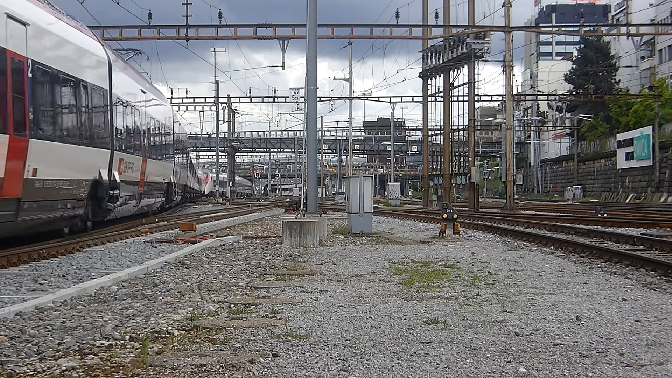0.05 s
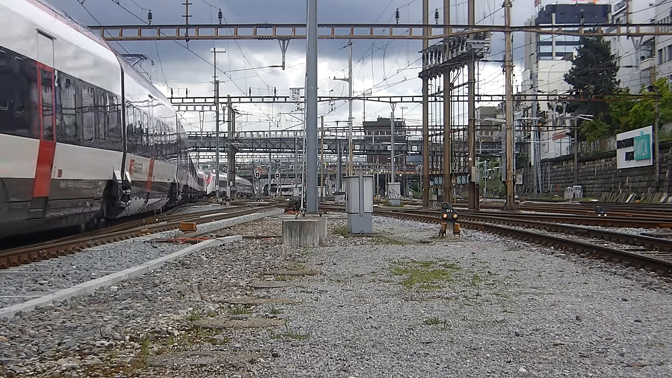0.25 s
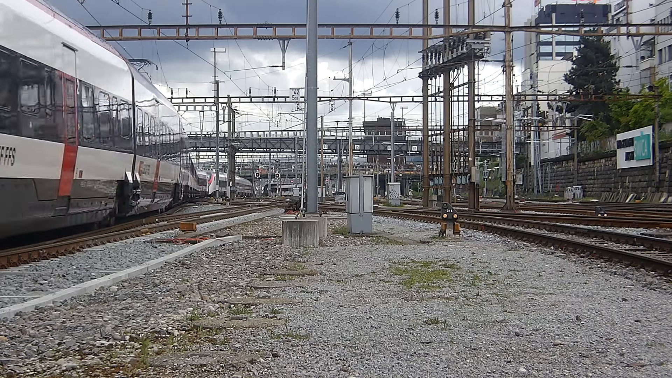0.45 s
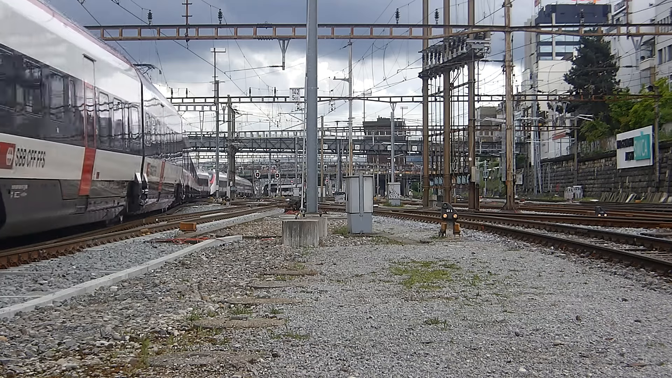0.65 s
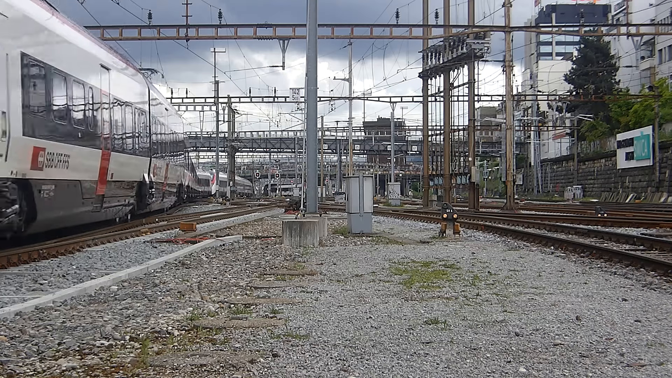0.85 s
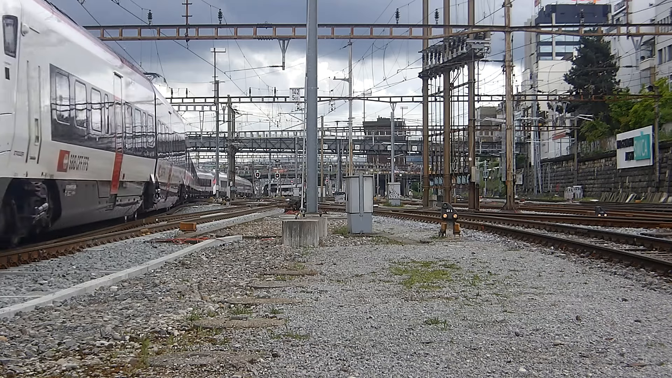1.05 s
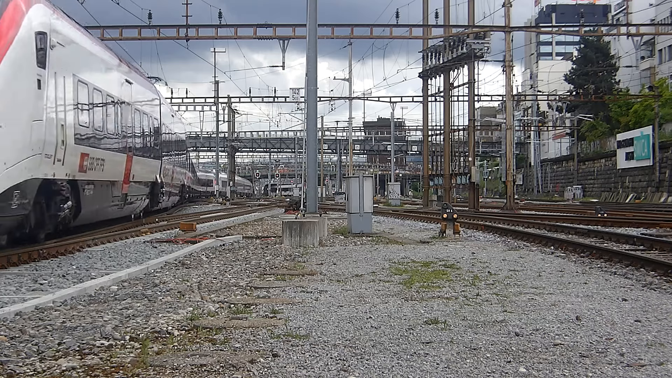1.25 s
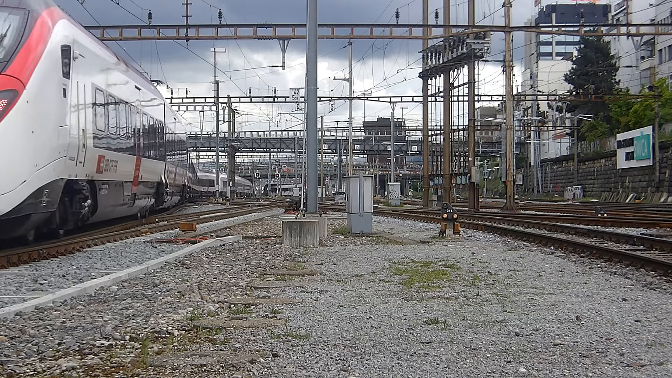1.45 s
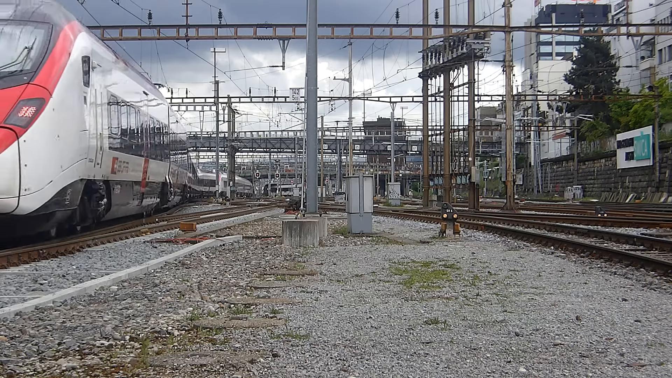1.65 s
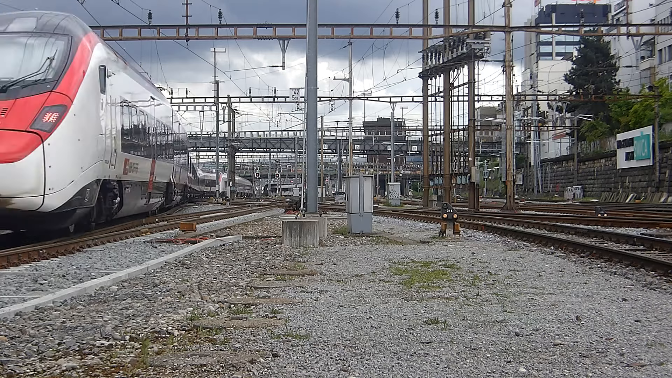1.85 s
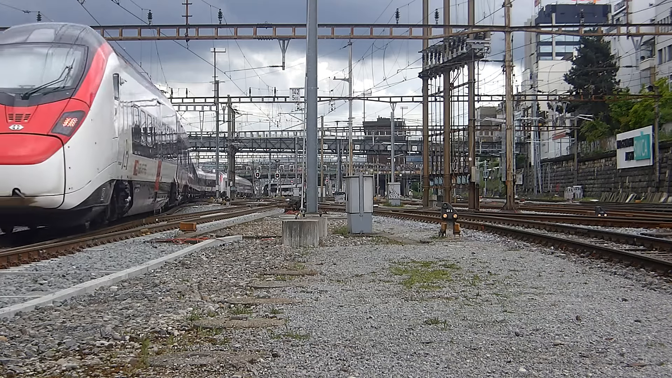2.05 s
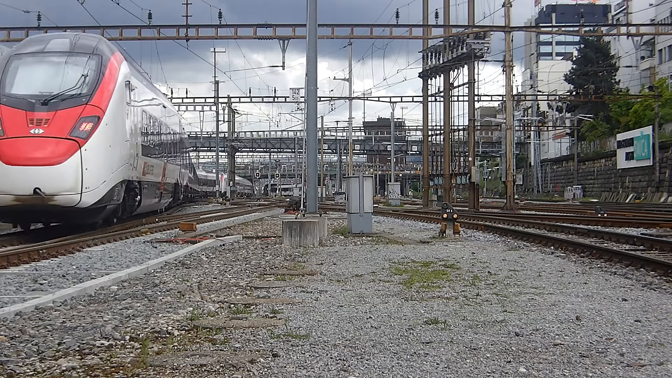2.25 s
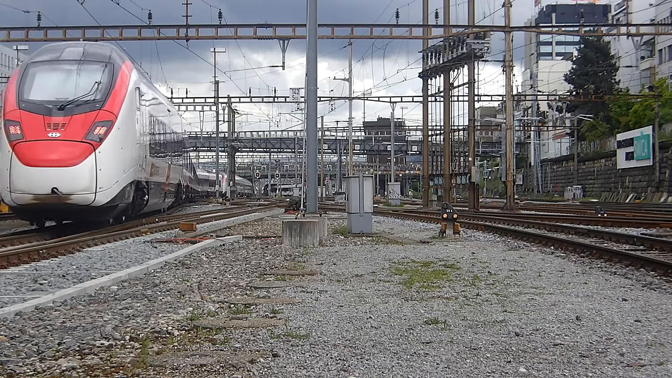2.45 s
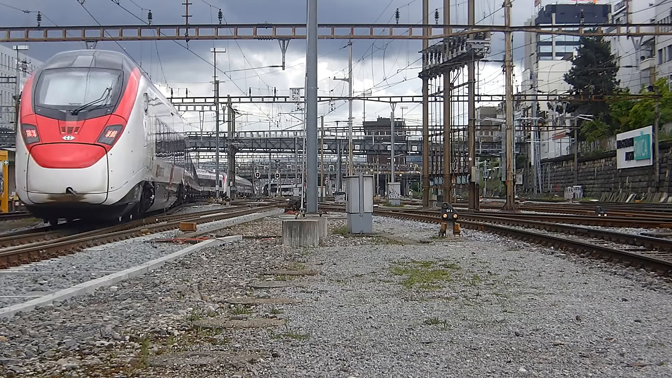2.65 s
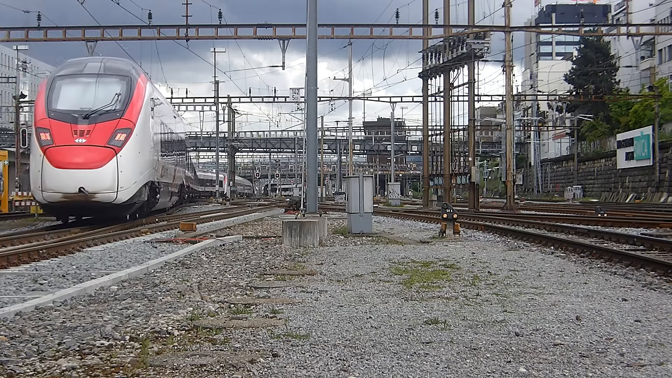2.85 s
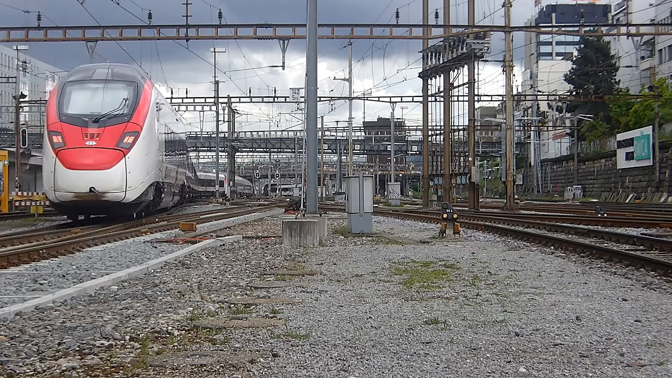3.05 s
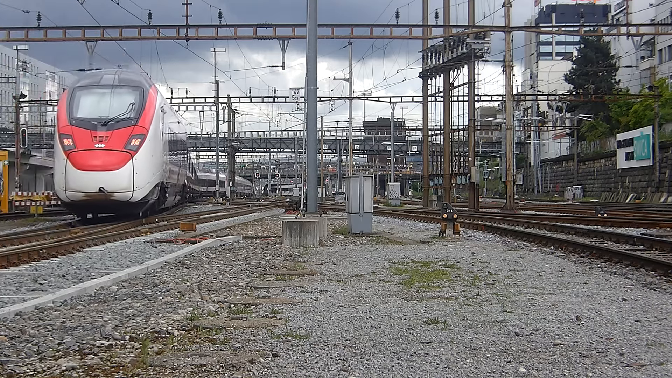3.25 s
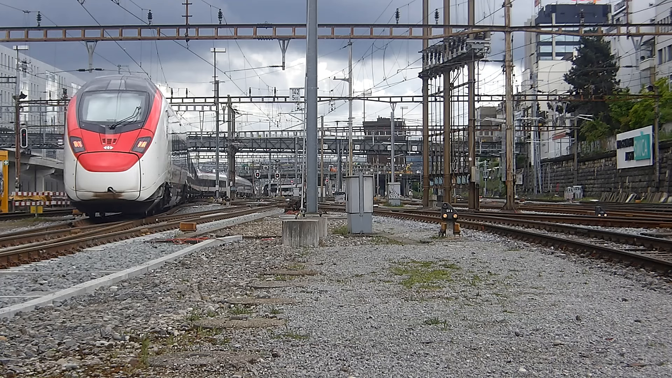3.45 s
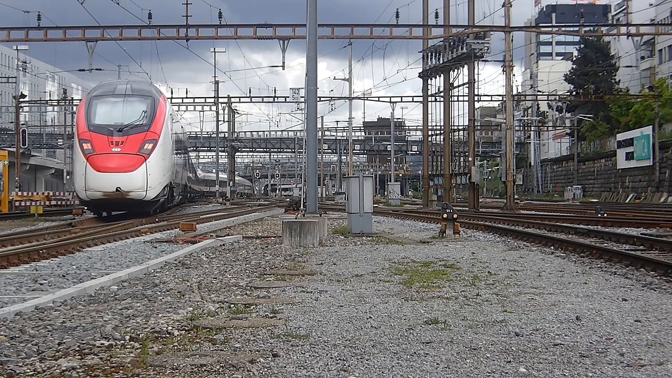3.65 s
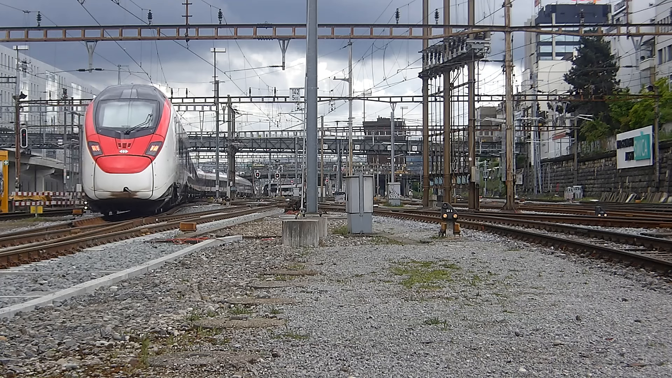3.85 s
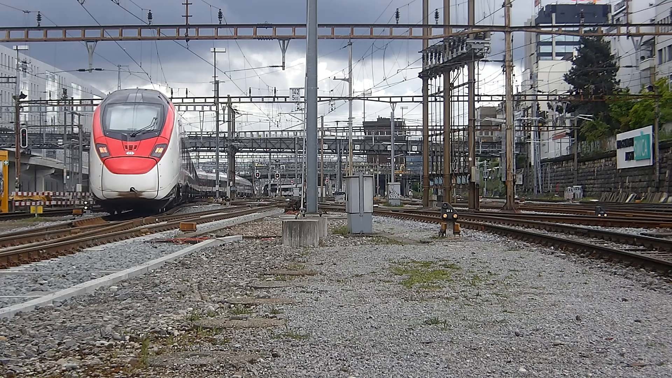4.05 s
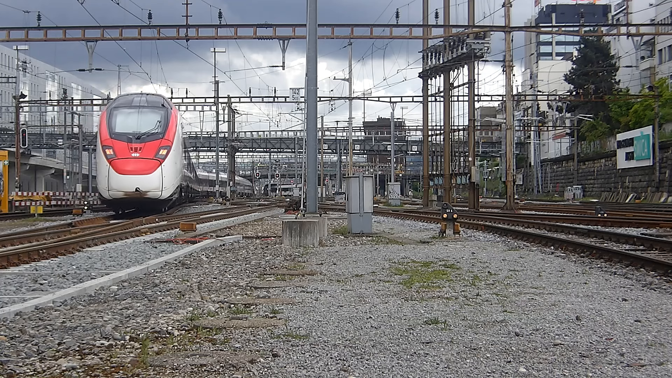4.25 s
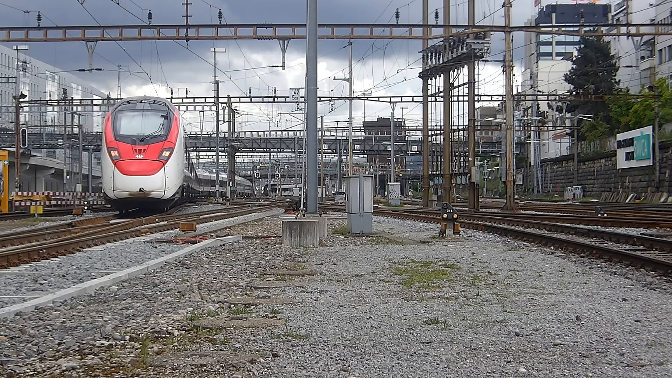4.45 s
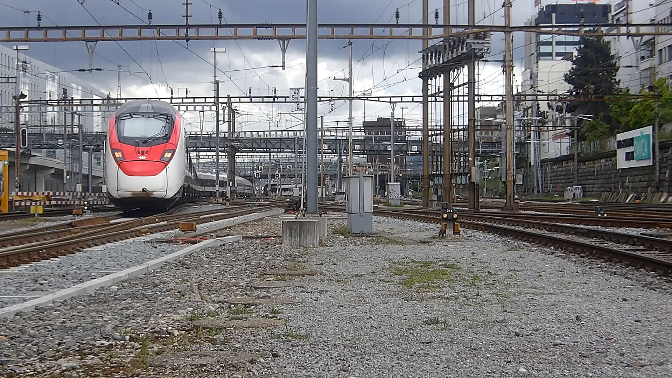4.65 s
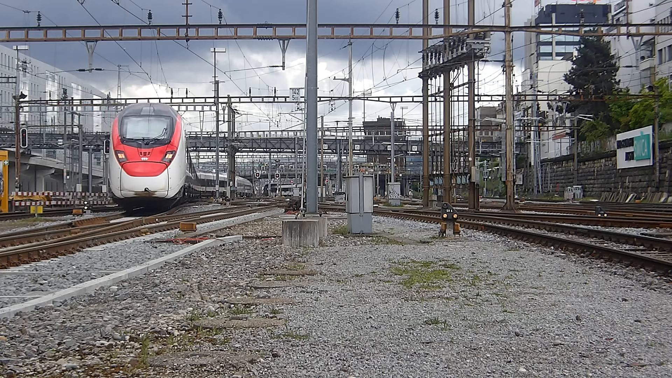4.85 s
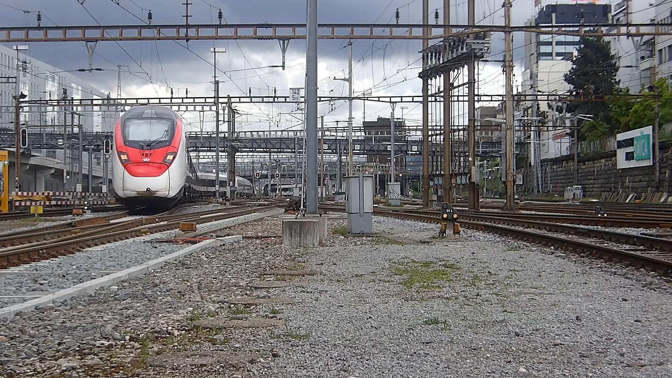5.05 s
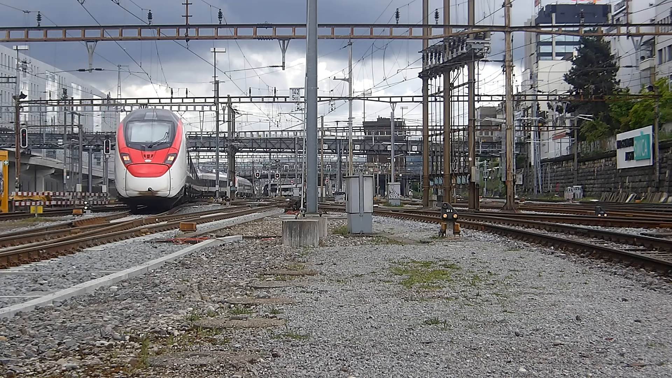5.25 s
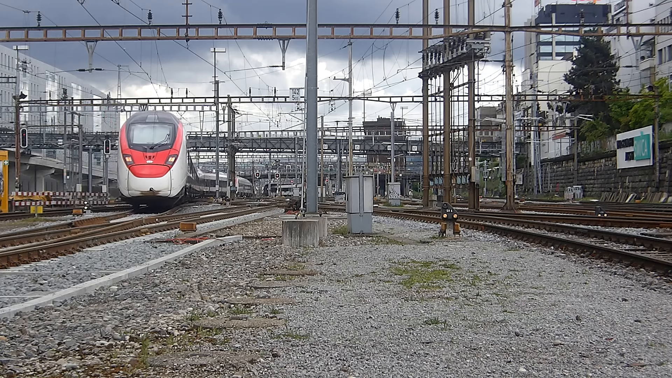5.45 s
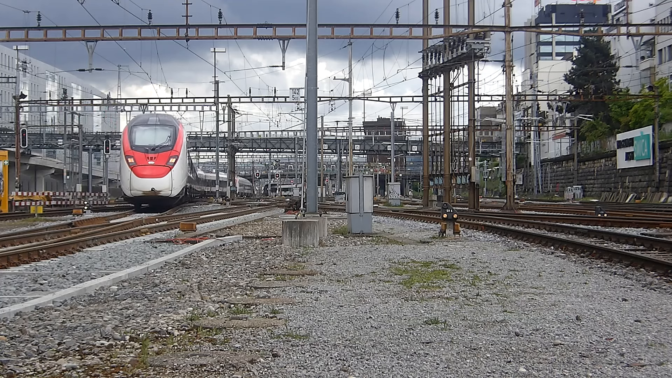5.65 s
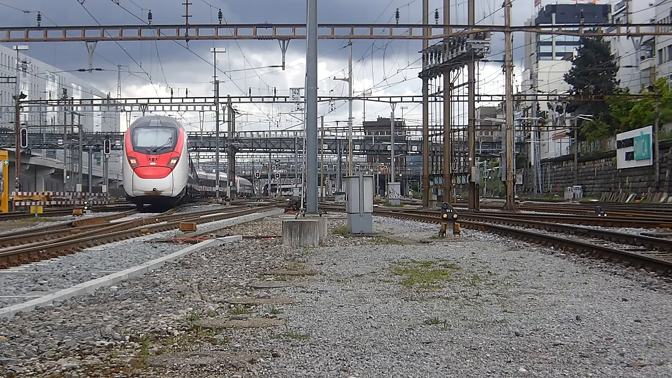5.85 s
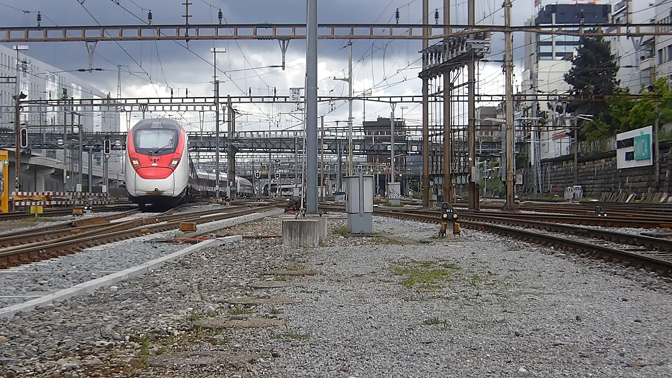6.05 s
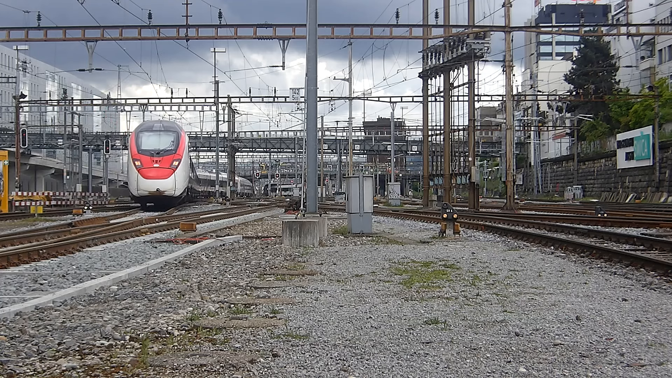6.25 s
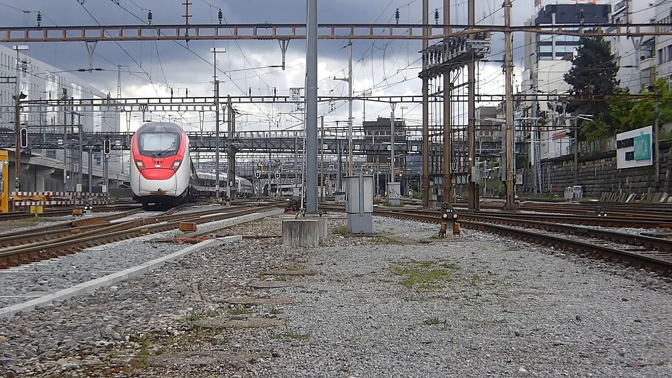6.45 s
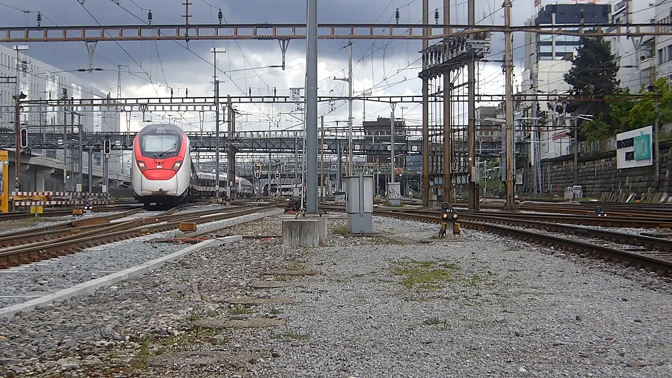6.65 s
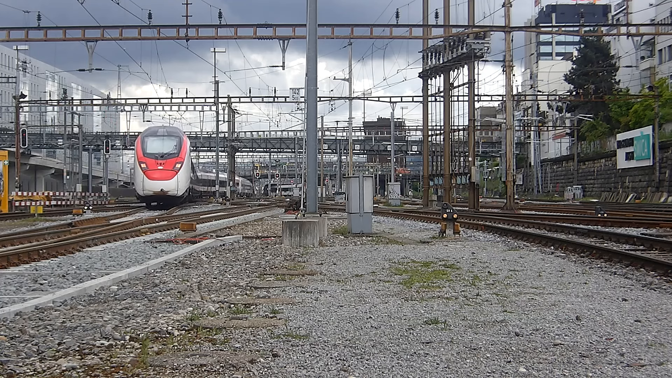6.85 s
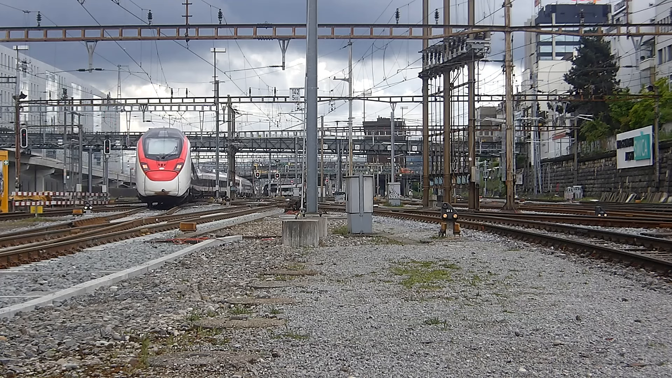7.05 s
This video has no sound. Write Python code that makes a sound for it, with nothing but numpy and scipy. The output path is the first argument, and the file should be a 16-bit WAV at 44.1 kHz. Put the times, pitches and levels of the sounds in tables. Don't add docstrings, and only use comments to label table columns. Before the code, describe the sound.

A small mono microphone stands beside a tight curve in an open rail yard. From 0 s a train grinds past with loud, dense flange squeal: several high metallic tones and bright gritty hiss, wavering and stuttering, with thin whistles surfacing. Dull car-body thuds and a loose low rattle come around 0.2-0.6 s, as the scrape jolts harder. The shrill scream continues until about 2.9 s, when a rapid cluster of hard wheel clacks, a thump and a short rattle strike. The squeal weakens from 3.3 s and nearly drops out near 3.6-3.8 s, with softer clacks at 3.65 s. A fresh hissing scrape bursts in just before 3.9 s and blooms into a second squeal, holding until about 4.6 s, then losing its treble and fading by 5.4 s. Faint falling chirps follow at 5.6-6.2 s, over lingering wheel ringing, receding rumble and low yard murmur to 7 s.

```python
import sys
import numpy as np
from scipy import signal
from scipy.fft import rfft, irfft, next_fast_len
from scipy.io import wavfile
from scipy.ndimage import uniform_filter1d

SR = 44100
rng = np.random.default_rng(int(sys.argv[2]) if len(sys.argv) > 2 else 0)


def file_out(sig):
    cols = np.atleast_2d(sig).T
    lim = np.clip(cols, -1, 1)
    pcm = np.round(lim * 32767).astype(np.int16)
    wavfile.write(sys.argv[1], SR, pcm)


def voltage_ratio(decibels):
    exponent = np.asarray(decibels, float) / 20
    return 10 ** exponent


N = 313110
T = np.arange(N) / SR

# [t/s, pressure level/dB, dullness/dB lost near 15 kHz to air and shading]
RUB = [(0, -0.5, 2), (.35, 0.5, -7), (.43, 3.5, -14), (.57, 1.5, -8.5), (1.25, -1, -5), (1.4, 0.5, -11.5),
       (2.74, 0, 2), (2.88, -3.5, 18), (3.32, -9, 6), (3.42, -17.5, 10), (3.64, -31, 24), (3.81, -40, -16),
       (3.872, -14, -18), (3.99, 1.5, -4), (4.51, -0.5, -3), (4.62, -1.5, 14), (5.02, -12, 16),
       (5.36, -36, 24)]
# [f/Hz, width/Hz, level/dB, split/Hz]
WEB_MODES = [(1440, 80, -11.5, 60), (2000, 110, -4, 60), (2170, 80, -18, 40), (2785, 120, -1, 50),
             (2948, 90, -0.5, 50)]
RIM_MODES = [(3677, 70, -5.5, 70), (4652, 80, -7, 90), (5652, 80, -6.5, 90), (6638, 110, -3.5, 130)]
SHRILL_MODES = [(9330, 60, -15.5, 60), (9550, 120, -2.5, 150), (9440, 430, -11.5, 220)]
FINE_MODES = [(7580, 100, -1, 100), (8575, 150, 0.5, 120), (10390, 140, 3, 80), (11420, 170, -1, 100),
              (12370, 130, -4.5, 60), (13000, 100, -18, 91)]
# [middle t/s, f/Hz, length/s, level/dB]
CATCHES = [(0.078, 6620, 0.27, -13), (.12, 4650, 0.2, -5), (1.9, 4650, 0.45, -3), (0.54, 5660, .15, 6),
           (0.9, 3660, 0.9, -6.5), (1.54, 5660, 0.099, 5.5), (2.4, 5660, 0.72, -5),
           (0.051, 9500, 0.21, 4.5), (3.69, 4650, 0.2, 7.5), (3.82, 6620, 0.25, -14), (4.03, 4650, 0.12, 6),
           (4.02, 3660, 0.1, -9), (4.38, 5660, 0.31, 4.5), (2.87, 5660, 0.24, 4.5), (5.37, 3660, 0.71, 4.5),
           (5.46, 6620, 0.25, -8), (6.12, 5660, 0.51, -7.5), (6.94, 6620, 0.27, -12), (6.84, 4650, 0.56, 7),
           (6, 3660, 0.53, 3.5), (2.21, 2950, 0.62, 9.5), (4.65, 2000, 0.94, 9), (0.84, 11420, 0.6, 6.5),
           (3, 7600, .13, 8), (3.32, 8600, .25, 12), (4.0, 5660, 0.1, -8), (5, 8600, 0.3, 7.5),
           (4.35, 7600, .3, 6), (3.36, 9500, 0.16, 8), (2.77, 9500, 0.15, 2.5)]
# [f/Hz, level/dB]
WEB_HISS = [(700, -36.5), (1100, -5.5), (1600, -10), (1900, 4.5), (2500, 2.5), (3400, -6), (4500, -15),
            (7000, -52.5)]
RIM_HISS = [(2000, -22.5), (3300, 3), (4200, -1.5), (6000, -4), (7200, -13), (8300, -5), (10000, -41.5)]
FINE_HISS = [(5000, -38), (7500, -8.5), (8700, 5), (11000, 4), (12000, 0.5), (13500, -3.5), (15000, -20.5),
             (16000, -21)]
# [middle t/s, length/s, level/dB]
LURCHES = [
    (.12, 0.29, -3),
    (.41, 0.048, 4.5),
    (1.9, 0.51, -3.5),
    (3.05, .15, 3.5),
    (4.0, 0.14, 2),
    (5.2, 0.22, -2),
]
# [start t/s, end t/s, f/Hz, level/dB]
WHISTLES = [(0, .21, 12198, -41), (.14, .54, 9420, -19), (.39, .8, 5663, -28), (.41, .7, 4661, -25),
            (.54, .8, 9474, -23), (.8, 1.08, 9463, -24), (1.11, 1.28, 6578, -31), (1.27, 1.43, 5641, -34),
            (1.32, 1.45, 9571, -25), (1.66, 1.82, 9485, -27), (1.68, 1.89, 12392, -40),
            (4.0, 4.45, 15062, -57), (2.02, 2.19, 9474, -27), (2.04, 2.19, 12381, -40),
            (2.22, 2.37, 3660, -32), (2.23, 2.37, 8559, -38), (2.3, 2.77, 13964, -46),
            (2.81, 3.07, 11347, -45), (3.0, 3.46, 10400, -39), (3.12, 3.33, 5620, -39),
            (3.17, 3.42, 6599, -36), (3.15, 3.43, 9453, -37), (.45, 1.08, 1010, -42),
            (3.2, 3.44, 8520, -43), (4.08, 4.69, 990, -40), (4.14, 4.45, 3639, -31), (2.9, 3.5, 13150, -55),
            (4.55, 4.84, 3639, -33), (4.75, 4.93, 11283, -47), (5.27, 5.79, 1001, -47)]
# [t/s, level/dB]
CLACKS = [
    (2.947, -7.5),
    (2.986, -12),
    (3.016, -9.5),
    (3.051, -18),
    (3.627, -19),
    (3.661, -20),
    (3.696, -19.5),
]
# [f/Hz, level/dB, t60/s]
JOINT_RING = [(2420, -1, .035), (2700, 0, .035), (3150, -2, .03)]
# [t/s, level/dB, f/Hz, t60/s, rise/s]
THUDS = [(.002, -27, 210, 0.22, 0.0058), (.245, -29, 550, .3, 0.0092), (.308, -14.5, 270, 0.14, 0.0034),
         (.318, -13.5, 263, 0.17, .012), (.36, -18, 544, 0.21, .008), (.385, -15.5, 382.6, 0.26, 0.014),
         (.3, -28, 936, 0.37, .01), (.53, -28.5, 236, 0.094, 0.0054), (.58, -27, 563, 0.54, .01),
         (2.943, -21.5, 360, 0.15, .002), (2.946, -29, 770, 0.46, 0.0033), (3.016, -25, 604, 0.19, 0.012),
         (3.49, -32, 268, 0.12, .004)]
# [t/s, level/dB, rise/s, hold/s, t60/s]
RATTLES = [
    (0.238, -31.5, .01, 0.053, 0.11),
    (0.304, -28, 0.0067, 0.14, 0.13),
    (0.519, -33.5, .008, 0.023, 0.19),
    (2.944, -24, 0.0022, 0.0088, 0.066),
    (2.992, -33, .003, 0.025, 0.21),
]
# [f/Hz, level/dB]
RATTLE_COLOUR = [(110, -30), (230, -4), (400, 0), (620, -3), (800, -11), (1100, -20), (3000, -40)]
# [t/s, level/dB, start f/Hz, length/s]
CHIRPS = [
    (5.575, -57, 8380, .3),
    (5.628, -56, 8350, .33),
    (5.7, -63, 7800, .25),
    (6.0, -74, 7400, .16),
    (6.15, -73, 7500, .18),
    (3.855, -50, 7100, .1),
]
# [f/Hz, width/Hz, level/dB, split/Hz]
RAIL_HUM = [(1007.5, 55, 0, 35)]
# [middle t/s, length/s, level/dB]
HUM_SWELLS = [
    (.46, 0.14, 15),
    (.8, 0.11, 9),
    (1.7, 0.42, -8),
    (2.5, 0.2, 9.5),
    (3.0, 0.17, 11.5),
    (4.25, 0.27, 13.5),
    (4.75, 0.35, 6.5),
    (5.5, .3, 3),
    (6.53, .1, 4.5),
]
# [t/s, level/dB]
ROLL_LEVEL = [
    (0, -30.5),
    (.18, -41),
    (.55, -36),
    (1.05, -44),
    (1.68, -37.5),
    (2.5, -44),
    (3.04, -34.5),
    (4.2, -38.5),
    (7.1, -42),
]
# [f/Hz, level/dB]
RUMBLE_COLOUR = [(20, -42), (60, -8.5), (120, -9), (200, 2.5), (400, 0.5), (800, -4.5), (1500, -5.5),
                 (3000, -12.5), (5000, -42.5)]
YARD_COLOUR = [(20, -39), (60, 0), (120, -4), (200, -5), (500, 0), (1200, -3.5), (2200, -5.5),
               (3300, -15.5), (4200, -17), (5300, -30), (6200, -34), (7600, -32), (9400, -22.5),
               (12000, -26.5)]
# [f/Hz, level/dB]
OVERALL_COLOUR = [(30, -12), (150, 0), (7000, 0), (7700, -2), (7800, -6), (7850, -20), (7900, -7), (8300, -9),
                  (8480, 0), (15700, 0), (15800, -60)]

SCRAPE_S, SCRAPE_LENGTH_S = 3.89, 0.052


def squeal():
    web = 0.68 * ring(WEB_MODES, wobble_db=2.03, waver=.3, core=.45, core_db=-3.5)
    web += 0.68 * hiss(WEB_HISS, patchy_db=2.2)
    rim = 0.94 * ring(RIM_MODES, wobble_db=1.0, waver=.3, core=.6, core_db=-1.63)
    rim += 0.32 * hiss(RIM_HISS, patchy_db=1.5)
    shrill = ring(SHRILL_MODES, wobble_db=1.5, waver=.4, core=.4, core_db=-2.5)
    fine = 0.98 * ring(FINE_MODES, wobble_db=3.5, waver=.3, core=.24, core_db=-6)
    fine += 1.03 * hiss(FINE_HISS, patchy_db=1.2) * voltage_ratio(-0.32 * np.maximum(control(column=2), 0))
    fine = dulled(fine)

    scream_end_s, scream_fade_s = 2.91, .1
    scream_db = 7.5 * (1 - np.tanh((T - scream_end_s) / scream_fade_s)) / 2
    web_gain = family(-29, 0.63, 0.1043, -1.5, extra_db=bumps(LURCHES), knee_db=-58)
    rim_gain = family(-23, 1, 0.0717, -7)
    shrill_gain = family(-28.5, 0.86, 0, -12, extra_db=scream_db, knee_db=-64)
    fine_gain = family(-29.5, 1.0, 0.0976, 6, knee_db=-60)
    far_rim = voltage_ratio(-48.5 - (T - 6))

    low = web_gain * web + np.hypot(rim_gain, far_rim) * rim
    high = shrill_gain * shrill + fine_gain * fine
    stutter = voltage_ratio(0.28 * drift(30.0))
    return colour(stutter * (low + high), [(250, -36.0), (900, 0)])


def ring(modes, wobble_db, waver, core, core_db):
    out, slow = np.zeros(N), T[::256]
    for hz, width, db, split in modes:
        grip_db = np.full(len(slow), float(db))
        for middle, catch_hz, length, catch_db in CATCHES:
            if abs(catch_hz / hz - 1) < .035:
                grip_db += catch_db * np.exp(-((slow - middle) / length) ** 2)
        for side, wide, part_db in ((-.5, core * width, core_db), (.5, width, 0.0071)):
            decay = np.exp(-np.pi * wide / SR)
            noise = rng.standard_normal(N) + 1j * rng.standard_normal(N)
            shake = signal.lfilter([1], [1, -decay], noise)
            line_hz = hz + side * split + waver * wide * drift(6.0)
            turn = np.exp(2j * np.pi * np.cumsum(line_hz) / SR)
            level_db = np.interp(T, slow, grip_db) + part_db + wobble_db * drift(9.0)
            out += voltage_ratio(level_db) * evened((shake * turn).real)
    return out / np.sqrt(2 * sum(voltage_ratio(mode[2]) ** 2 for mode in modes))


def family(rest_db, per_push, per_dull, scrape_db, extra_db=0, knee_db=-99):
    push = control(column=1) - 18 * np.maximum(T - RUB[-1][0], 0)
    dull = np.maximum(control(column=2), 0)
    scrape = np.exp(-((T - SCRAPE_S) / SCRAPE_LENGTH_S) ** 2)
    level_db = rest_db + per_push * push + per_dull * dull + scrape_db * scrape
    return np.sqrt(np.maximum(voltage_ratio(level_db + extra_db) ** 2 - voltage_ratio(knee_db) ** 2, 0))


def dulled(x):
    hz, t, z = signal.stft(x, SR, nperseg=256)
    slope = (np.clip(hz - 11000, 0, 4800)[:, None] / 4000) ** 1.7
    under = np.maximum(12000 - hz, 0)[:, None] / 4000
    late_db = 11 * under * np.exp(-((t - SCRAPE_S + .02) / SCRAPE_LENGTH_S) ** 2)
    times, _, dullness = np.transpose(RUB)
    lost_db = slope * np.interp(t, times, dullness) + late_db
    return signal.istft(z * voltage_ratio(-lost_db), SR, nperseg=256)[1][:N]


def control(column):
    rows = np.transpose(RUB)
    return np.interp(T, rows[0], rows[column])


def whistles():
    out, wander = np.zeros(N), drift(20.0)
    for start, end, hz, db in WHISTLES:
        shake = wander[round(start * SR):round(end * SR)]
        swell = np.sin(np.linspace(0, np.pi, len(shake))) ** .8
        swell *= voltage_ratio(db + 1 + 2 * shake[::-1])
        phase = 2 * np.pi * np.cumsum(hz * (1 + .0009 * shake)) / SR
        add(out, start, np.sqrt(2) * swell * np.sin(phase))
    return out


def clacks():
    out, t = np.zeros(N), T[:3000]
    for (s, db), luck in zip(CLACKS, rng.random((len(CLACKS), 8))):
        clack = np.zeros(len(t))
        for (hz, level, t60), detune, phase in zip(JOINT_RING, luck, luck[4:]):
            tone = np.sin(2 * np.pi * (hz * (.97 + 0.055 * detune) * t + phase))
            clack += voltage_ratio(level - 60 * t / t60) * tone
        clack *= 1 - np.exp(-t / 0.0018)
        add(out, s, 0.56 * voltage_ratio(db) * clack)
        add(out, s + .0115, .6 * voltage_ratio(db - 4) * clack)
        add(out, s + 0.0087, 0.41 * voltage_ratio(db - 24) * clack)
    return out


def thuds():
    out, t = np.zeros(N), T[:SR // 2]
    for s, db, hz, t60, rise in THUDS:
        luck = rng.standard_normal(len(t))
        rough = evened(uniform_filter1d(uniform_filter1d(luck, size=180), size=180))
        hardness, sharpness = voltage_ratio(db + 15), min(.004 / rise, 1) ** 2
        pitch = hz * (1 + hardness * sharpness * np.exp(-t / .025))
        swing = np.sin(2 * np.pi * np.cumsum(pitch) / SR) * (1 + 0.62 * rough)
        add(out, s, voltage_ratio(db - 60 * t / t60) * (1 - np.exp(-t / rise)) * swing)
    return out


def rattles():
    level, t = np.zeros(N), T[:SR // 2]
    for s, db, rise, hold, t60 in RATTLES:
        fall_db = 60 * np.maximum(t - hold, 0) / t60
        add(level, s, voltage_ratio(db - fall_db) * (1 - np.exp(-t / rise)))
    return level * hiss(RATTLE_COLOUR, patchy_db=2.5)


def chirps():
    out = np.zeros(N)
    end_hz, glide_s = 6520, .14
    for s, db, start_hz, length in CHIRPS:
        t = np.arange(0, length, 1 / SR)
        hz = end_hz + (start_hz - end_hz) * np.exp(-t / glide_s)
        swell = np.sin(np.pi * t / length) ** 0.37
        add(out, s, voltage_ratio(db) * np.sin(2 * np.pi * np.cumsum(hz) / SR) * swell)
    return out


def rolling():
    hum = ring(RAIL_HUM, wobble_db=2.0, waver=0.2007, core=0.461, core_db=2.2)
    hum *= voltage_ratio(-46 + bumps(HUM_SWELLS))
    rumble = voltage_ratio(np.interp(T, *np.transpose(ROLL_LEVEL))) * hiss(RUMBLE_COLOUR, patchy_db=1.3)
    return 0.66 * hum + 0.84 * rumble


def yard():
    return voltage_ratio(-45) * hiss(YARD_COLOUR, patchy_db=0.21)


def hiss(points, patchy_db):
    z = rng.standard_normal((N // 128 + 5, 257, 3))
    patches = uniform_filter1d(z[..., 2], size=20, axis=0)
    patches = evened(uniform_filter1d(patches, size=6, axis=1))
    field = (z[..., 0] + 1j * z[..., 1]) * voltage_ratio(patchy_db * patches)
    noise = signal.istft(field.T, nperseg=512, noverlap=384)[1][:N]
    return evened(colour(noise, points))


def drift(per_s):
    knots = rng.standard_normal(2000)
    smooth = uniform_filter1d(knots, size=3) + .5 * knots[::-1]
    return np.interp(T * per_s * 3, np.arange(len(knots)), evened(smooth))


def bumps(rows):
    return sum(db * np.exp(-((T - s) / length) ** 2) for s, length, db in rows)


def colour(x, points):
    size = next_fast_len(len(x))
    f, db = np.transpose(points)
    hz = np.fft.rfftfreq(size, 1 / SR)
    gain = voltage_ratio(np.interp(np.log(hz + 1), np.log(f), db))
    return irfft(rfft(x, size) * gain, size)[:len(x)]


def evened(x):
    return x / np.sqrt(np.mean(x ** 2) + 1e-20)


def add(mix, s, sound):
    part = mix[round(s * SR):][:len(sound)]
    part += sound[:len(part)]


def scene():
    train = squeal() + whistles() + clacks() + thuds() + rattles() + chirps()
    mono = train + rolling() + yard()
    return np.array([mono, mono])


def roll_off(x):
    return signal.sosfilt(signal.butter(12, 15800, fs=SR, output="sos"), x)


def record(dry):
    heard = colour(dry[0], OVERALL_COLOUR)
    return roll_off(np.array([heard, heard]))


dry = scene()
out = record(dry)
file_out(out)
```